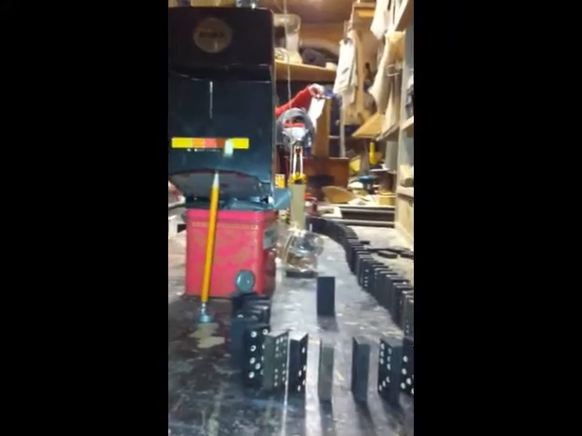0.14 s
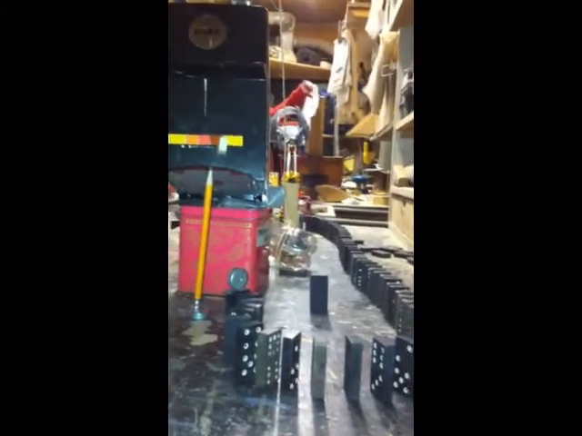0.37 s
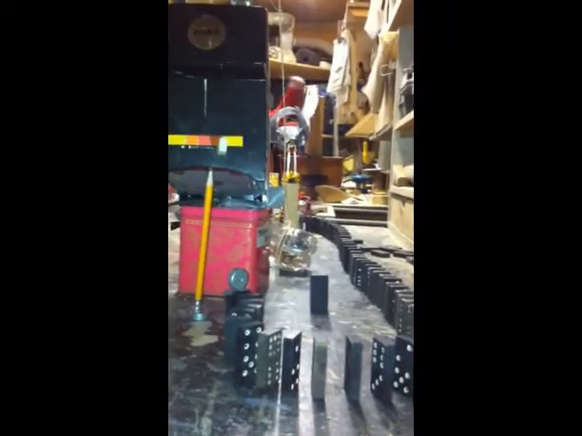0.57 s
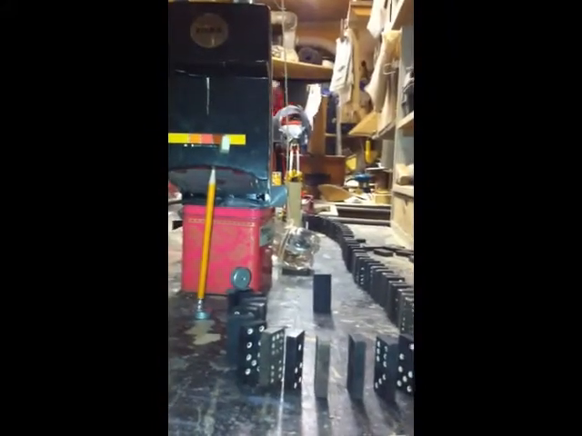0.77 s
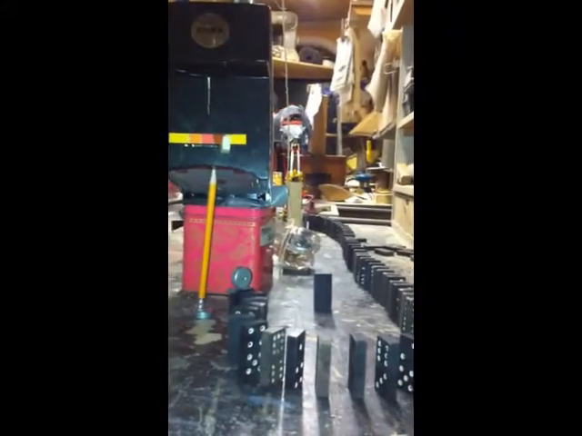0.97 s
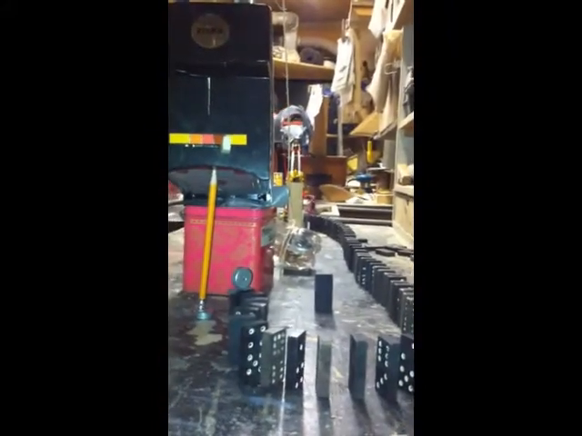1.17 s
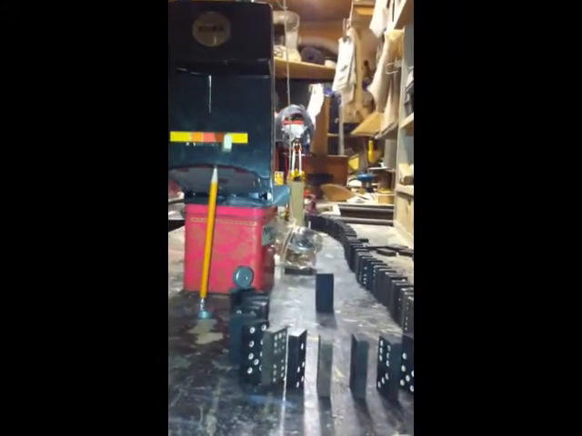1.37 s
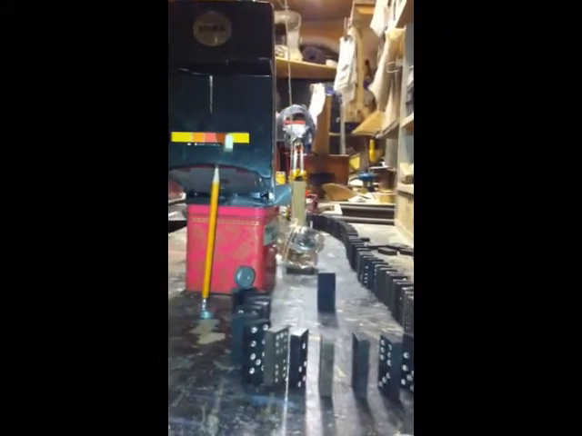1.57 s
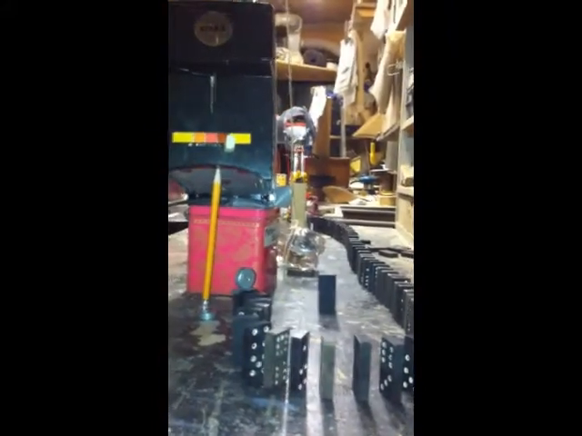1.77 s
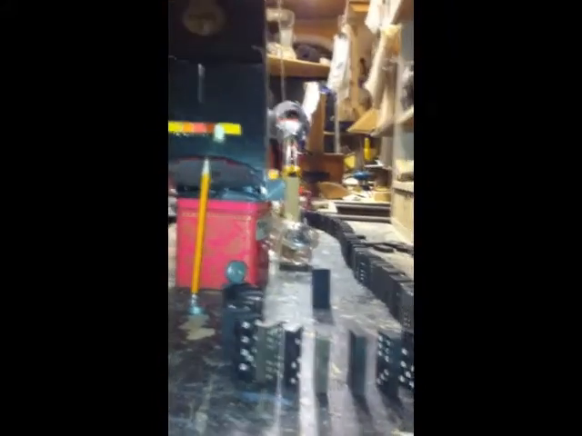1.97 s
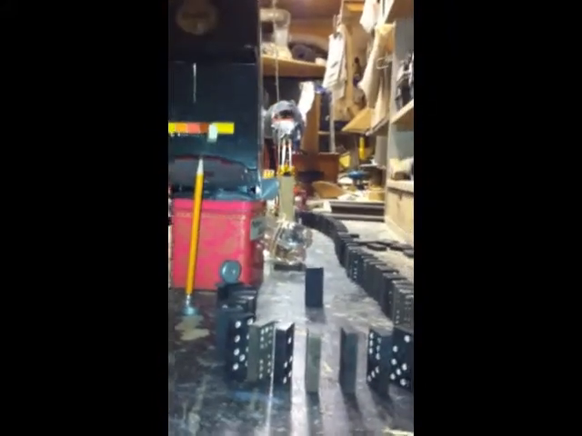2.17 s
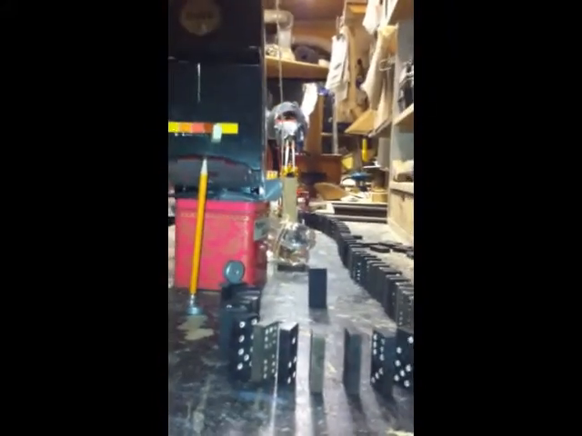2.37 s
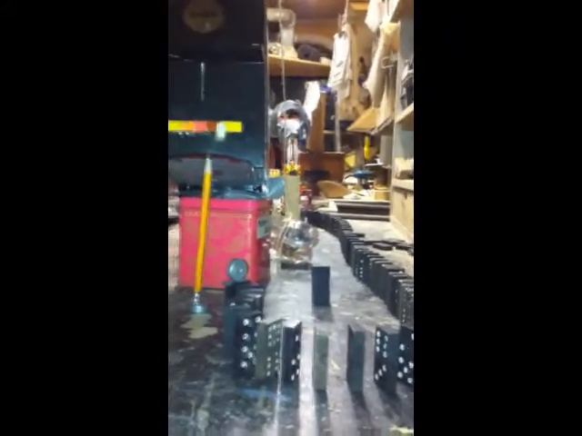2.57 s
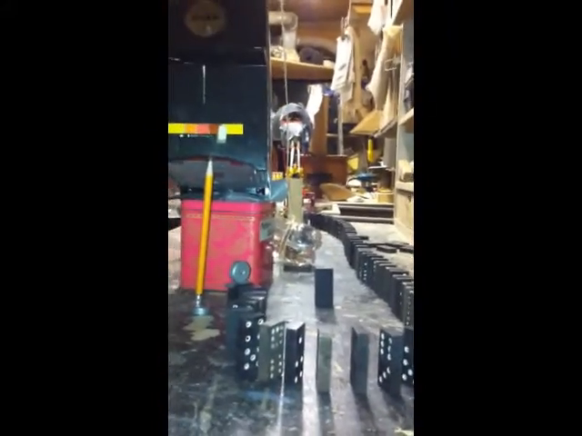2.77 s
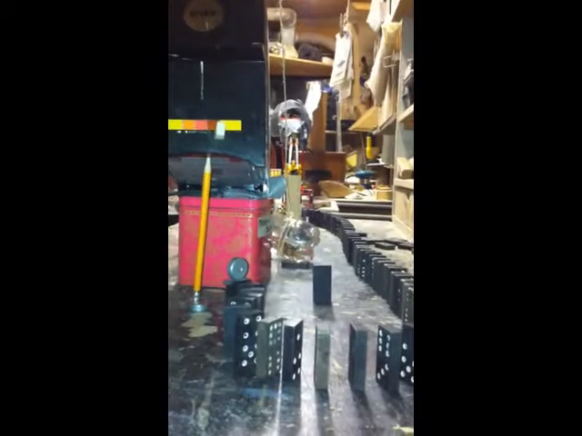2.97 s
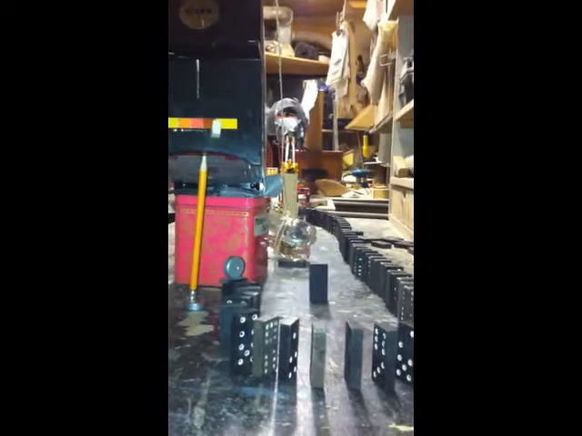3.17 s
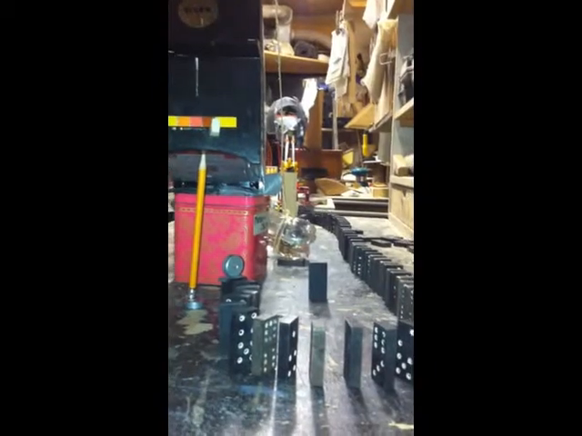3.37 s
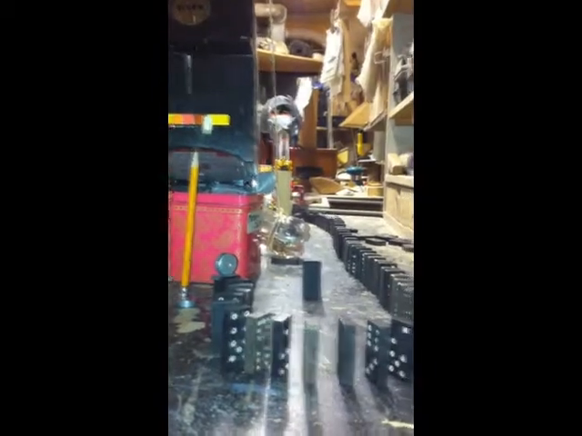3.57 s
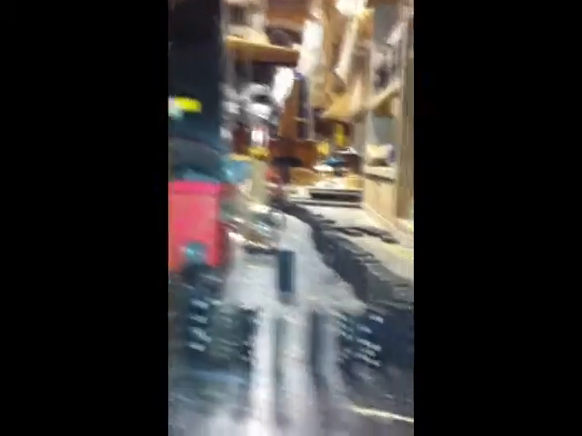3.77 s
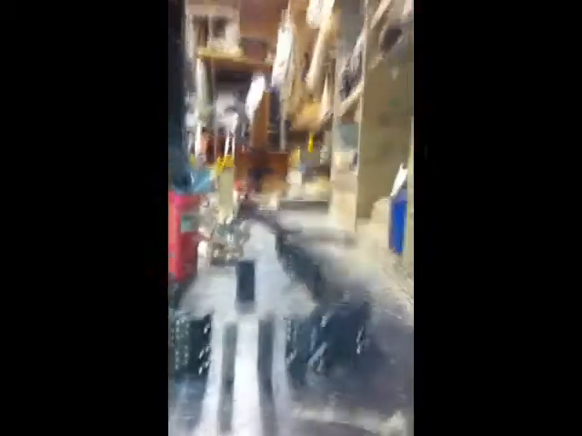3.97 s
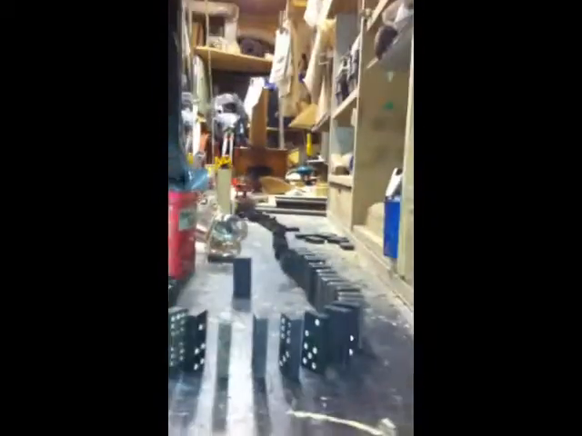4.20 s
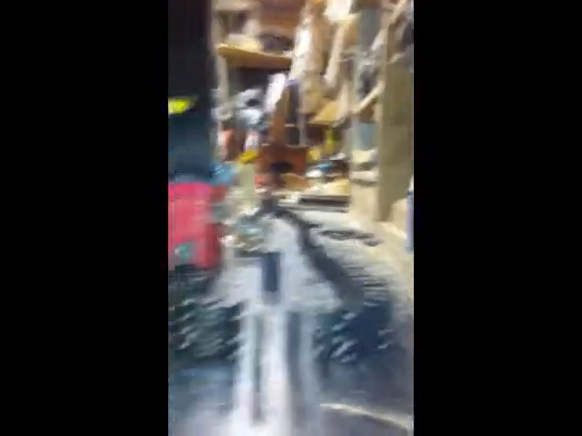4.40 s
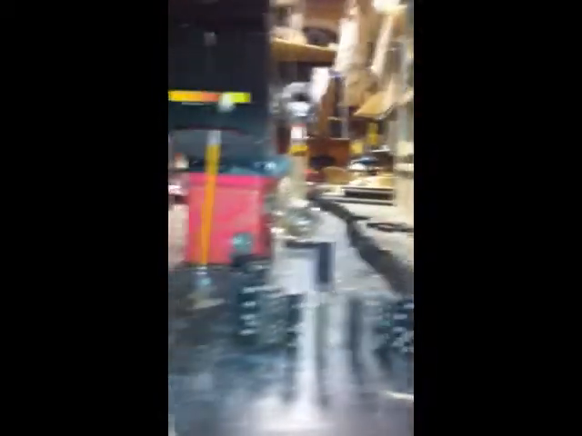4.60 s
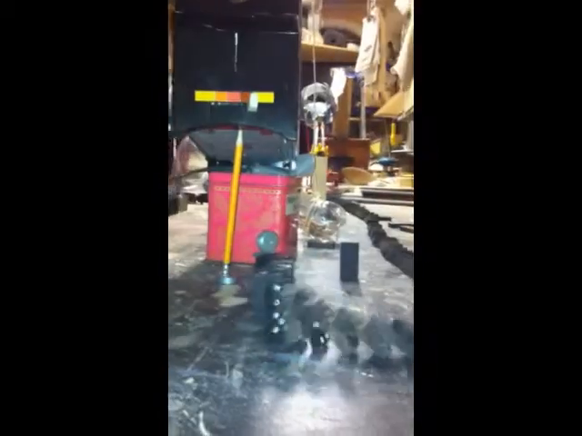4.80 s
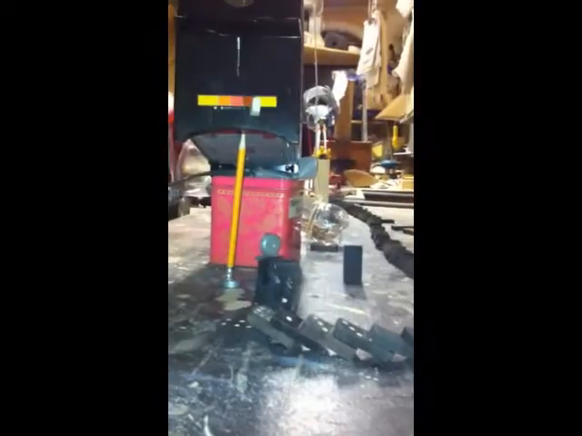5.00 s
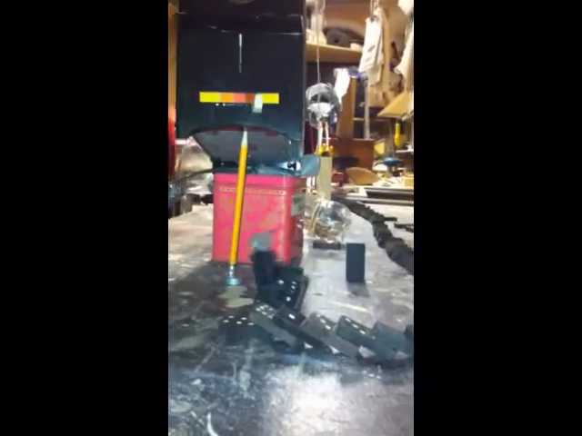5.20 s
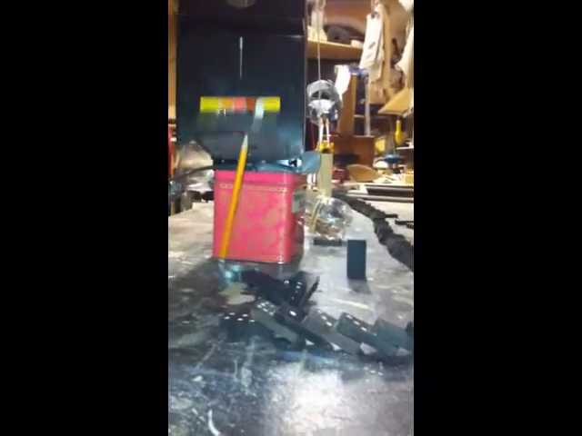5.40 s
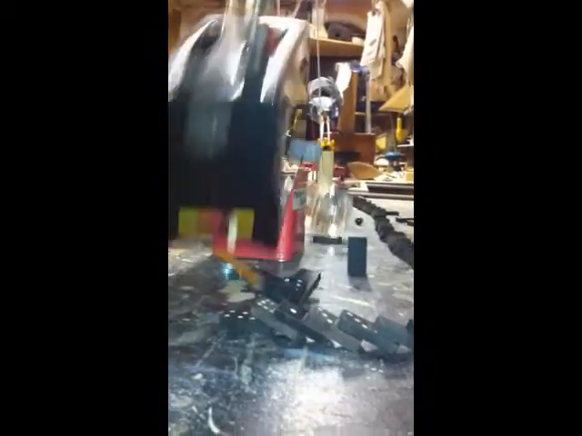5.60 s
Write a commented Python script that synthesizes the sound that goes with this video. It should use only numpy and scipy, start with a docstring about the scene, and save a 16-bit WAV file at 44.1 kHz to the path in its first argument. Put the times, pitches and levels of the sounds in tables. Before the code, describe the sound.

In a small cluttered workshop, faint rustling, dull bumps and small clicks come from the far end of a bench. A hard piece drops and bounces ever faster to rest. Plastic dominoes then topple in a rapid clicking chain, growing louder as it runs toward the microphone. After a brief gap, a contraption slams down close by with a hard woody crack and short rattle.

```python
"""A long row of plastic dominoes topples along a wooden workbench, toward the microphone.
First, things are handled at the far end amid soft rustling noise; a hard piece drops and bounces to rest.
Each tile is a coloured clack and a ring on its neighbour, and its kick sounds the modes of the bench.
The last tiles trip a contraption, whose damped modes and rough noise crash close by.
The small, cluttered workshop adds early echoes and a decaying tail of noise; its air is steady noise."""
import sys
import numpy as np
from scipy import signal
from scipy.fft import rfft, irfft, next_fast_len
from scipy.io import wavfile
from scipy.ndimage import map_coordinates

SR = 44100
rng = np.random.default_rng(int(sys.argv[2]) if len(sys.argv) > 2 else 0)


def transcribe(u):
    """Save the signal u as a 16-bit wav file named by the first command-line argument.

    u: samples, shape (n,) or (channels, n), limited to [-1, 1]; the rate is SR.
    q: integer samples, one column per channel.
    """
    v = np.clip(np.atleast_2d(u).T, -1, 1)
    q = np.round(v * 32767).astype(np.int16)
    wavfile.write(sys.argv[1], SR, q)


N = 249165
T = np.arange(12288) / SR  # time base of one blow, s

# The dropped piece bounces ever faster. Each row: time in seconds, level in dB.
PIECE_BOUNCES = [(3.048, 1.5), (3.217, -4.5), (3.301, -7.5), (3.365, -10.5), (3.404, -18.5), (3.439, -16),
                 (3.466, -18.5), (3.487, -21.5), (3.506, -22)]
# Tile strikes tile. Each row: time in seconds, level in dB, ring in Hz, sharp edge in dB over the level.
TILE_STRIKES = [(3.4039, -17.5, 4400, -23.5), (3.5293, -31, 4020, -37), (3.5584, -26, 4240, -39),
                (3.6043, -36, 4100, -22), (3.6447, -30, 4080, -27), (3.6858, -30, 6400, -36),
                (3.7258, -34, 6540, -42), (3.7593, -27.5, 6500, -37), (3.8053, -35, 4200, -23),
                (3.8507, -24, 4100, -28), (3.891, -21, 6050, -20), (3.9236, -28.5, 4080, -18),
                (3.9312, -24, 4130, -32), (3.9655, -21, 5300, -20), (4.0061, -22.5, 4400, -34),
                (4.048, -25, 4260, -11.5), (4.084, -22, 5000, -16), (4.0913, -23.5, 5220, -11),
                (4.117, -21.5, 5020, -15), (4.15, -23, 5230, -12), (4.167, -23.5, 5250, -23),
                (4.1869, -17.5, 4530, -8.5), (4.2238, -20.5, 5330, -17), (4.2542, -22.5, 7690, -21),
                (4.2835, -21.5, 7200, -18), (4.3186, -25.5, 5030, -17), (4.3459, -18.5, 5300, -9),
                (4.375, -19.5, 4700, -13.5), (4.3823, -23, 6100, -19), (4.4041, -19, 7020, -14.5),
                (4.4682, -22, 4050, -30), (4.4987, -16, 6940, -13.5), (4.5284, -22, 6600, -6),
                (4.5492, -18, 5530, -8), (4.6053, -19, 4870, -9.5), (4.6317, -23, 6700, -10),
                (4.6584, -22, 7860, -17), (4.6949, -19.5, 7020, -28), (4.7192, -27, 4320, -20),
                (4.7472, -18.5, 5170, -12), (4.7584, -41, 4160, -8), (4.7735, -22.5, 4700, -20),
                (4.801, -16.5, 5220, -13), (4.8273, -17.5, 5760, -13), (4.838, -21.5, 5740, -20),
                (4.861, -20.5, 4830, -9.5), (4.8681, -14, 5230, -15), (4.8774, -21.5, 8880, -22),
                (4.8876, -20, 5030, -17), (4.8973, -15.5, 6840, -11), (4.9256, -10.5, 6150, -12.5),
                (4.9304, -18, 4900, -19), (4.9475, -13, 6100, -14), (4.9585, -21, 5440, -7),
                (4.9765, -19, 5700, -18), (5.006, -28, 4360, -19), (5.0368, -14.5, 5400, -19.5),
                (5.0732, -11.5, 5120, -14), (5.0804, -13.5, 5110, -18), (5.1005, -18.5, 5300, -18),
                (5.122, -17.5, 5440, -19), (5.1341, -8.5, 8750, -17), (5.1703, -12.5, 5000, -20.5),
                (5.1871, -17.5, 5570, -34), (5.3051, -35, 5600, -34)]
# The bench top's modes. Each row: frequency in Hz, strength in dB, t60 in seconds before any further damping.
BENCH_MODES = [(266, -25, 0.14), (388, -24, 0.19), (545, -16, 0.11), (660, -21, 0.033), (833, -2, 0.053),
               (988, -3, 0.039), (1156, -3, 0.069), (1303, -5.5, 0.051), (1570, -4, 0.0035),
               (1687, -7.5, 0.031), (1892, -7, 0.042), (2180, -19, 0.11)]
# Colour of hard plastic contact. Each row: frequency in Hz, level in dB.
CLACK_COLOUR = [(300, -58), (1500, -9.5), (3000, 3.5), (3900, 6), (5200, 6.5), (7000, 5.5), (9000, -6.5),
                (12000, -27)]
# Colour of the sharp top of a contact. Each row: frequency in Hz, level in dB.
EDGE_COLOUR = [(5000, -22), (8000, 0.5), (10500, 4), (13000, 1.5), (15500, -5.5)]
# Colour of a knock on wood. Each row: frequency in Hz, level in dB.
WOOD_COLOUR = [(100, -32), (230, -3.5), (450, -7.5), (800, -2), (1200, 4), (2000, -7), (3000, -8),
               (5000, -23.5)]
# Steady colour of the rumbling bench. Each row: frequency in Hz, density in dB per Hz.
RUMBLE_COLOUR = [(60, -8.5), (130, -12.5), (230, 4.5), (380, 2.5), (460, -5), (550, 0.5), (800, 0.5),
                 (1150, -1), (1600, -4), (3000, -20), (6000, -28.5)]


def amp(db):
    """Decibels to gain."""
    return 10 ** (np.asarray(db) / 20)


def norm(x):
    """Scale to energy 1."""
    return x / np.sqrt(np.sum(x ** 2) + 1e-20)


def along(points, hz):
    """Read (Hz, value) points on a logarithmic frequency axis."""
    point_hz, value = np.transpose(points)
    return np.interp(np.log(hz + 1), np.log(point_hz), value)


def fade(t60):
    """A fall of 60 dB in t60 seconds."""
    return np.exp(-np.log(1000) * T / np.maximum(t60, 1e-4))


def swell(start, length, attack, release_t60):
    """Gain over the whole scene: attack, hold until length seconds after the start, release."""
    t = np.arange(N) / SR - start
    release = np.exp(-np.log(1000) * np.maximum(t - length, 0) / release_t60)
    return np.clip(t / attack, 0, 1) * release


def wobble(rate):
    """A smooth random curve, rate knots a second."""
    knots = rng.standard_normal(int(N * rate / SR) + 4)
    return map_coordinates(knots, [np.arange(N) * rate / SR])


def add(track, s, x):
    """Mix x into the track at time s."""
    part = track[max(round(s * SR), 0):][:len(x)]
    part += x[:len(part)]


def causal(spectrum):
    """Minimum-phase frequency response of a colour, so that its energy comes at the onset."""
    cepstrum = irfft(np.log(amp(along(spectrum, np.fft.rfftfreq(len(T), 1 / SR)))))
    cepstrum[1:len(T) // 2] *= 2
    cepstrum[len(T) // 2 + 1:] = 0
    return np.exp(rfft(cepstrum))


def noise(spectrum):
    """Steady coloured noise of rms 1."""
    m = next_fast_len(N)
    colour = amp(along(spectrum, np.fft.rfftfreq(m, 1 / SR)))
    x = irfft(rfft(rng.standard_normal(m)) * colour, m)[:N]
    return norm(x) * np.sqrt(N)


def burst(colour, t60, rise=0):
    """A short, rough contact in the given colour, of energy 1, setting in over rise seconds."""
    onset = 1 - np.exp(-T / max(rise, 1 / SR))
    rough = rng.standard_normal(len(T)) * onset * fade(t60)
    return norm(irfft(rfft(rough) * colour))


def ring(modes, scatter_db, detune, pitch=1):
    """Damped modes of energy 1; their strengths and tuning vary with the spot that is struck."""
    hz, db, t60 = np.transpose(modes)
    size, shift = rng.standard_normal((2, len(hz)))
    turns = (pitch * hz * (1 + detune * shift))[:, None] * T
    build_up = 1 - np.exp(-2 * turns)  # a mode takes about half a cycle to build up
    partials = np.sin(2 * np.pi * turns) * build_up * fade(t60[:, None])
    return norm(amp(db + scatter_db * size) @ partials)


def soften(x, hz, order=2):
    """A contact that lasts a while excites little above hz."""
    low_pass = signal.butter(order, np.clip(hz, 500, .45 * SR), fs=SR, output="sos")
    return signal.sosfilt(low_pass, x)


def room(x, near_db, tail_db, gap=.005, near_t60=0.053):
    """A sound and, gap seconds later, its echoes: sparse ones off nearby shelves and the workshop's tail."""
    # How fast the workshop's tail dies. Each row: frequency in Hz, t60 in seconds.
    wall_decay = [(150, 0.34), (600, 0.14), (1400, 0.16), (4000, 0.26), (9000, 0.13), (15000, 0.11)]
    hz, t, z = signal.stft(rng.standard_normal(len(T)), SR, nperseg=256)
    decay = np.exp(-np.log(1000) * t / along(wall_decay, hz)[:, None])
    tail = signal.istft(z * decay, SR, nperseg=256)[1][:len(T)]
    shelves = rng.standard_normal(len(T)) ** 3 * fade(near_t60)  # cubing leaves a few strong echoes
    reflections = amp(near_db) * norm(shelves) + amp(tail_db) * norm(tail)
    echoes = np.pad(reflections, (round(abs(gap) * SR), 0))
    echoes[0] += 1  # the direct sound
    return signal.fftconvolve(x, echoes)[:len(x)]


def background():
    """Quiet workshop air, with swells of soft rustling: coloured noise whose level flickers."""
    # Swells of soft rustling noise. Each row: start in seconds, length in seconds, low rustle in dB, hiss in dB.
    rustles = [(0.395, .11, -52.5, -57.5), (0.603, 0.57, -63, -64), (1.22, 0.25, -51.5, -56),
               (1.544, 0.37, -57, -71), (1.76, 0.23, -50.5, -56), (1.983, 0.42, -52, -60),
               (2.406, 0.17, -58, -82), (2.797, 0.076, -61, -65), (3.06, 0.57, -58, -61)]
    # Steady colour of the low rustle. Each row: frequency in Hz, density in dB per Hz.
    low_colour = [(60, -9), (130, -10), (330, -3.5), (500, -5), (1150, -1.5), (1500, -4.5), (3000, -14),
                  (6000, -27)]
    # Steady colour of the hiss. Each row: frequency in Hz, density in dB per Hz.
    hiss_colour = [(1000, -10), (3000, 0), (7000, -0.5), (15000, -10)]
    # Steady colour of the workshop air. Each row: frequency in Hz, density in dB per Hz.
    air_colour = [(25, 12), (60, -15), (125, -3.5), (200, 0.5), (380, -2.5), (520, -7.5), (900, -10.5),
                  (2000, -14.5), (7000, -21), (15500, -20.5)]
    low, hiss = amp(-69.5), amp(-67)  # a faint rustle lies under the swells
    flicker = wobble(70)
    for s, length, low_db, hiss_db in rustles:
        rise_and_fall = swell(s, length, attack=0.056, release_t60=0.36)
        low = np.hypot(low, amp(low_db) * rise_and_fall)
        hiss = np.hypot(hiss, amp(hiss_db) * rise_and_fall)
    low_rustle = low * amp(2.3 * flicker - 2.5) * noise(low_colour)
    hissing = hiss * amp(flicker - 4.5) * noise(hiss_colour)
    return amp(-60.5) * noise(air_colour) + low_rustle + hissing


def far_end(contact_t60_s=0.058, halving_db=10):
    """Bumps and clicks of handling, distant and so rich in echo; long contacts set in softly."""
    # Dull bumps on bench and floor. Each row: time in seconds, level in dB, boom in Hz.
    bumps = [(0.030, -42.5, 341), (0.407, -41.5, 310), (0.492, -27.5, 225), (0.502, -35.5, 495),
             (0.753, -42.5, 306), (0.776, -47, 253), (0.872, -45, 325), (1.189, -37.5, 303),
             (1.309, -31, 310), (1.33, -35.5, 232), (1.562, -46, 600), (1.904, -40.5, 236),
             (2.184, -35, 215), (2.392, -28, 380), (2.803, -41.5, 382), (3.896, -29, 205),
             (3.912, -33, 130), (3.929, -38, 300), (4.196, -27.5, 360)]
    # Things handled, from snaps to scuffs. Each row: time in seconds, then click, body and edge in dB.
    handling = [(0.032, -70, -57.5, -75), (0.493, -64, -45.5, -70), (0.873, -64, -52, -64),
                (1.19, -26, -48, -37), (1.255, -37.5, -46.5, -53), (1.286, -43, -54, -57),
                (1.31, -59, -38, -56), (1.369, -25, -32.5, -27), (1.453, -37, -43, -43),
                (1.8122, -33, -41, -25), (1.96, -49, -40.5, -64), (2.177, -36.5, -36.5, -35.5),
                (2.258, -36, -38.5, -45), (2.314, -39, -41, -34.5), (2.3651, -31, -35, -17),
                (2.369, -30.5, -35.5, -36), (2.798, -41, -49, -46), (2.858, -41, -46.5, -43),
                (2.879, -39.5, -49.5, -40.5), (2.916, -41, -51, -36), (2.951, -44, -58, -43),
                (3.14, -45, -39.5, -73), (3.172, -42, -39, -63), (3.305, -30.5, -42, -50)]
    # Colour of a dull bump. Each row: frequency in Hz, level in dB.
    thud_colour = [(40, -48), (80, -15), (125, 4), (170, 1.5), (240, -6), (370, 7.5), (470, -4.5),
                   (800, 1.5), (2000, -34), (6000, -40)]
    # Colour of a distant click. Each row: frequency in Hz, level in dB.
    far_colour = [(500, -3), (2000, -8.5), (4200, -2.5), (6500, -2.5), (10000, -17.5), (15000, -74)]
    out = np.zeros(N)
    thud, far, wood, edge = map(causal, (thud_colour, far_colour, WOOD_COLOUR, EDGE_COLOUR))
    for s, db, boom_hz in bumps:
        boom = amp(db + 11.5) * ring([(boom_hz, 0, .05)], 0, detune=0.021)
        bump = boom + amp(db + 12.5) * burst(thud, t60=0.038, rise=0.00094)
        add(out, s, room(bump, near_db=0.0, tail_db=-9))
    for s, db, body_db, edge_db in handling:
        # a contact is half as long for every halving_db of edge over body
        t60 = contact_t60_s * .5 ** (max(edge_db - body_db, 0) / halving_db)
        click = amp(db + 13.5) * burst(far, t60, rise=0.19 * t60)
        click += amp(edge_db + 17) * burst(edge, t60, rise=0.077 * t60)
        body = amp(body_db + 21.0) * burst(wood, t60=0.12, rise=0.00076)
        add(out, s, room(click + body, near_db=-16.5, tail_db=-5))
    return out


def chatter(count=7, flight_s=.015, shrink=.92, first_db=-22.5, loss_db=.2):
    """The last, tiny bounces, each flight shorter than the one before, as rows of PIECE_BOUNCES."""
    k = np.arange(count)
    times = PIECE_BOUNCES[-1][0] + np.cumsum(flight_s * shrink ** k)
    return list(zip(times, first_db - loss_db * k))


def bounces(wall_delay=0.0053, contact_hz=3700, duller_db=30, graze_db=-11):
    """A hard piece grazes the bench, then rings and knocks one spot again and again, duller as it weakens."""
    # The piece's own modes. Each row: frequency in Hz, strength in dB, t60 in seconds.
    piece_modes = [(1500, -2, .005), (2220, 0, .007), (3050, -1, .007), (3400, -8, .005)]
    # Colour of its knock on the bench. Each row: frequency in Hz, level in dB.
    knock_colour = [(100, -43), (170, -36.5), (275, -5), (330, -26), (600, -11.5), (800, 1), (1200, 3.5),
                    (1400, 4), (1750, -13.5), (2300, -7), (3200, -18), (4500, -27.5), (10000, -43)]
    ring_db, ring_grows = 3, 1.21  # ring before softening at a 0 dB blow; dB of ring per dB of blow
    out = np.zeros(N)
    bench = norm(ring(BENCH_MODES, 0, 0) * fade(t60=0.22))
    knock = norm(irfft(causal(knock_colour))) + amp(-13) * bench
    piece = ring(piece_modes, 0, 0)
    graze = soften(amp(graze_db) * burst(causal(CLACK_COLOUR), t60=0.033), hz=6400, order=3)
    add(out, PIECE_BOUNCES[0][0] - .007, room(graze, near_db=7.5, tail_db=-2))
    for s, db in list(PIECE_BOUNCES) + chatter():
        blow = amp(ring_db + ring_grows * db) * piece
        add(blow, .001, amp(db + 12.5) * knock)  # low bending waves travel more slowly along the bench
        add(blow, 0.00087 + wall_delay, amp(db - 1.5) * knock)  # the wall behind the bench throws them back
        blunt = soften(blow, contact_hz * 2 ** (db / duller_db), order=3)  # an octave per duller_db
        add(out, s, room(blunt, near_db=-6.5, tail_db=-8, gap=0.00307, near_t60=0.022))
    return out


def nearness_db(s):
    """Gain of the airborne sound of the toppling front, against a distance of one metre."""
    # The front runs toward the microphone and curves past it. Each row: time in seconds, distance in metres.
    front = [(3.4, 1.64), (3.9, 1.36), (4.2, 0.62), (4.6, 0.36), (4.9, .22), (5.2, 0.25)]
    distance_m = np.interp(s, *np.transpose(front))
    return -20 * np.log10(np.maximum(distance_m, 1e-2))


def sliding(rumble_db=-46, scrape_db=-53, scrape_nears=0.05):
    """Behind the front, the leaning tiles scrape in tiny slips and set the bench rumbling."""
    run_start_s, run_end_s = 3.33, 5.05  # the row is in motion
    length = run_end_s - run_start_s
    slips = norm(amp(6 * wobble(450))) * np.sqrt(N)
    rumble = swell(run_start_s, length, attack=.2, release_t60=3.3) * amp(rumble_db + 2.86 * wobble(50))
    near_db = scrape_nears * nearness_db(np.arange(N) / SR)  # the scrape gains only a little by nearness
    scrape = swell(run_start_s, length, attack=.3, release_t60=.15) * amp(scrape_db + near_db)
    return rumble * noise(RUMBLE_COLOUR) + scrape * slips * noise(CLACK_COLOUR)


def rebounds(scatter_db=0.0, detune=0.094, delay_s=.009, delay_spread=.5, loss_db=18):
    """After each strike the tile touches again, lightly, as rows of TILE_STRIKES."""
    chance = rng.standard_normal((len(TILE_STRIKES), 3))
    touches = []
    for (s, db, hz, edge_db), (late, size, shift) in zip(TILE_STRIKES, chance):
        again_s = s + delay_s * np.exp(delay_spread * late)
        again_db = db - loss_db + scatter_db * size
        touches.append((again_s, again_db, hz * np.exp(detune * shift), edge_db))
    return touches


def dominoes(typical_db=-26, knock_grows=0.77):
    """Each tile clacks and rings on its neighbour; its foot kicks the bench, which sounds alike near and far."""
    # A tile's modes. Each row: multiple of its ring, strength in dB, t60 in seconds before further damping.
    tile_modes = [(.77, -8.5, 0.031), (1, 9, 0.07), (1.1, -3.5, .012), (1.66, -26, 0.0074)]
    contact_hz, sharp_edge_db, octave_db = 15100, -14, 24  # top falls an octave per octave_db less edge
    last_tiles_s, free_ring_db = 5.02, 6.5  # the last tiles have little leaning on them and ring more freely
    out = np.zeros(N)
    clack, edge, wood = map(causal, (CLACK_COLOUR, EDGE_COLOUR, WOOD_COLOUR))
    for s, db, ring_hz, edge_db in list(TILE_STRIKES) + rebounds():
        knock_db = knock_grows * (db - nearness_db(s) - typical_db)  # the bench ignores airborne distance
        free_db = free_ring_db * (s > last_tiles_s)  # ring gained over clack
        top_hz = contact_hz * 2 ** ((edge_db - sharp_edge_db) / octave_db)

        snap = amp(db + 7.5 - free_db / 2) * burst(clack, t60=0.0094)
        snap += amp(db + edge_db + 17) * burst(edge, t60=0.0081)
        tile = ring(tile_modes, scatter_db=0, detune=0.0094, pitch=ring_hz)
        note = amp(db + 5.0 + free_db / 2) * norm(tile * fade(t60=0.074))  # the leaning neighbour damps it
        bench = amp(knock_db - 11) * ring(BENCH_MODES, scatter_db=6, detune=0.018)
        bench += amp(knock_db - 11.5) * burst(wood, t60=0.028)

        add(out, s, room(soften(snap, top_hz), near_db=-4.0, tail_db=-7.5, gap=0.0016, near_t60=0.029))
        add(out, s, soften(note, top_hz))  # the ring is heard without echo
        add(out, s, room(soften(bench, top_hz), near_db=-12.0, tail_db=-8.5))
    return out


def crash(count=2, rattle_s=0.0098, rattle_loss_db=8.5):
    """The tripped contraption lands close by, its loose parts knock again, and the bench rumbles on."""
    # The blows of the fall. Each row: time in seconds, level in dB, crack in dB.
    falls = [(5.4425, -11, -32), (5.453, -11, -22.5), (5.4561, 0.5, -15), (5.4757, -1, -17),
             (5.504, -8, -39), (5.514, -15.5, -30.5), (5.639, -18, -29)]
    # The contraption's modes. Each row: frequency in Hz, strength in dB, t60 in seconds before further damping.
    frame_modes = [(232, -54, 0.26), (430, -53, 0.036), (564, -36, 0.052), (710, -15.5, 0.028),
                   (880, -8.5, 0.028), (1066, -27, 0.031), (1217, -5, 0.04), (1380, -0.5, 0.02),
                   (1660, 2, 0.02), (1765, -2, 0.11), (1920, -29, 0.0058)]
    # Colour of its crack. Each row: frequency in Hz, level in dB.
    smash_colour = [(100, -27), (500, 5), (1700, -13), (2400, 0), (3200, 4), (5500, 1), (7100, 3.5),
                    (8000, -2), (11000, -5), (15000, -12)]
    out, smash, wood = np.zeros(N), causal(smash_colour), causal(WOOD_COLOUR)
    for s, db, crack_db in falls:
        for k in range(count):
            frame = ring(frame_modes, scatter_db=1.5, detune=.015)  # each blow at a slightly different spot
            blow = amp(db + 11.5) * norm(frame * fade(t60=0.028))
            blow += amp(db + 1.5) * burst(wood, t60=0.041, rise=0.0013)
            blow += amp(crack_db + 20.5) * burst(smash, t60=0.015, rise=0.00026)
            heard = room(blow, near_db=-11, tail_db=-10.5, gap=0.0035, near_t60=0.033)
            add(out, s + k * rattle_s, amp(-k * rattle_loss_db) * heard)
    rumble = swell(falls[0][0], length=0.07, attack=0.029, release_t60=0.74) * noise(RUMBLE_COLOUR)
    return out + amp(-44) * rumble


def scene():
    """Everything at one microphone."""
    return (background() + far_end() + bounces() + sliding() + dominoes() + crash())[None]


def record(dry, low_cut_hz=55, top_hz=15600):
    """The small microphone loses the deep bass; the recorder clips at full scale and has a band limit."""
    m = next_fast_len(N + SR // 2)
    hz = np.fft.rfftfreq(m, 1 / SR)
    keep = hz ** 2 / (hz ** 2 + low_cut_hz ** 2) * (hz < top_hz)
    return irfft(rfft(np.clip(dry, -1, 1), m) * keep, m)[..., :N]


dry = scene()
out = record(dry)
transcribe(out)
```